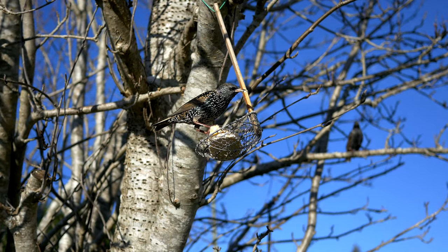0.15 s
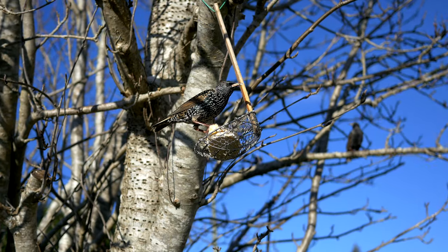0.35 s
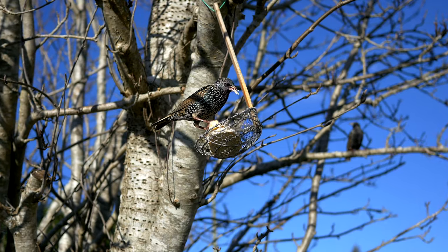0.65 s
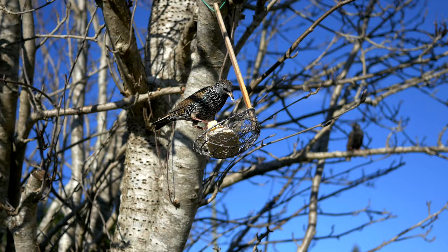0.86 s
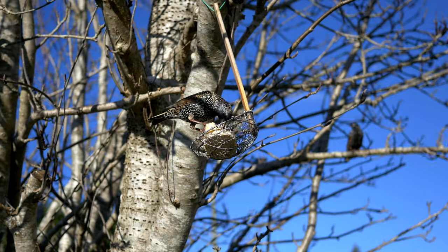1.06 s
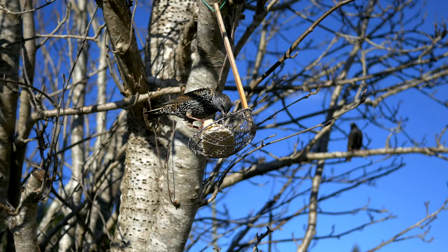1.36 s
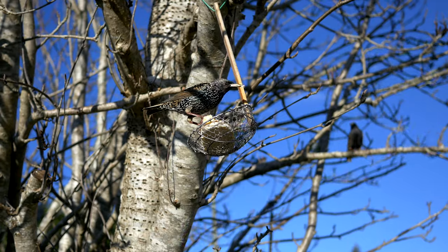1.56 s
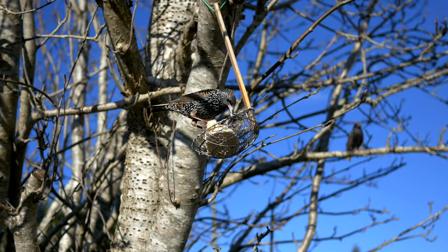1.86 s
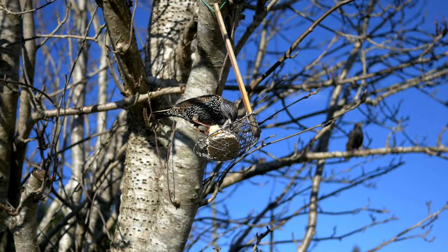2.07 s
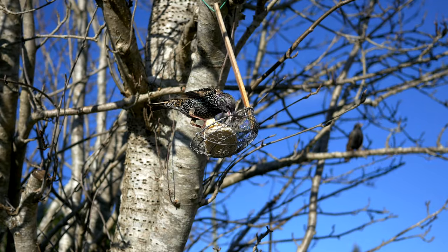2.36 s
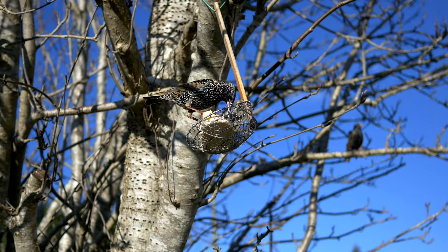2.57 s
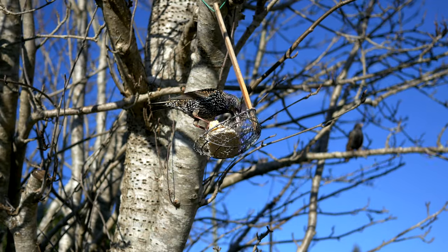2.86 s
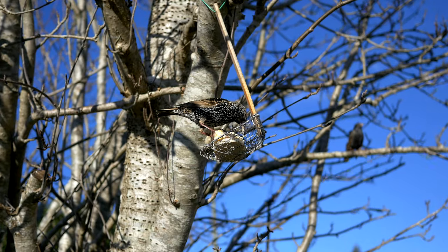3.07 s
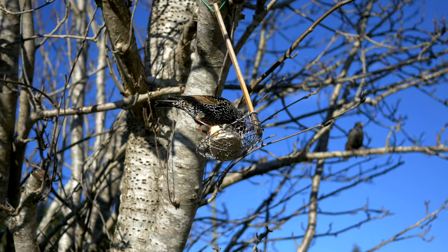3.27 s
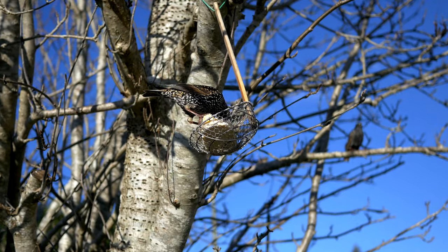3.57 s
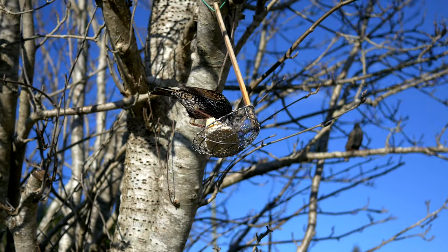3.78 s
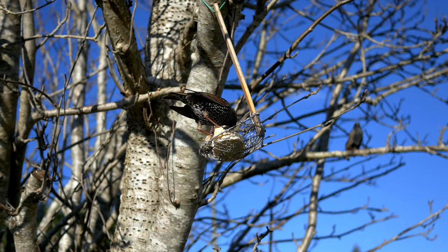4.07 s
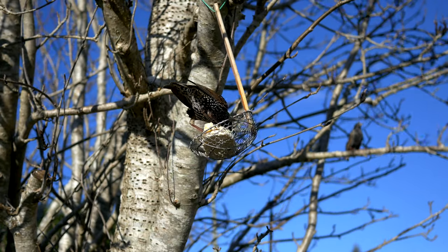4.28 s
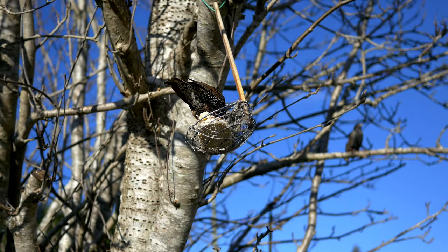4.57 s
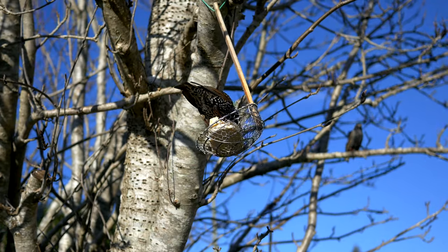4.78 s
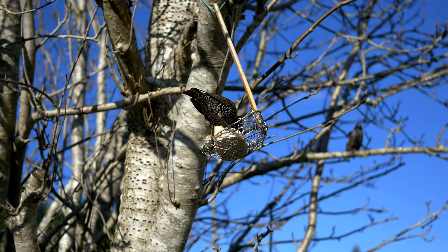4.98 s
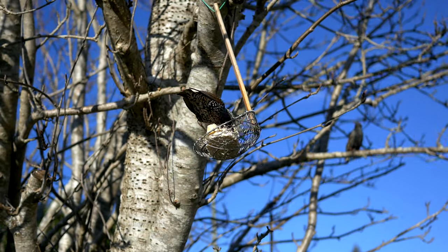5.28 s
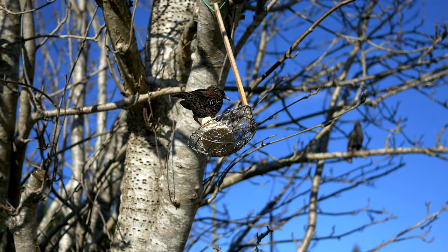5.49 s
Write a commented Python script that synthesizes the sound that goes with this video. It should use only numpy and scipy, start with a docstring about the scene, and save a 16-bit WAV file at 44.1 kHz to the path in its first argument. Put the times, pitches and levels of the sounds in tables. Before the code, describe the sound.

A starling at a tree feeder gives fast buzzy trills, clicks and short rising whistles while wind rumbles hard on the microphone over distant traffic.

```python
"""A garden feeder among bare trees, with a far road behind: a starling sings fast buzzy trills and short croaks.
The trills are swept harmonic voices with rasp, the croaks hoarse harmonic tones, the hisses and clicks shaped noise.
Gliding tones make rising whistles, chirps and another bird's long note; trunks and branches echo the birds.
Wind buffets the microphone as low rumble, much harder after the first second, over the coloured noise of traffic."""
import sys
import numpy as np
from scipy import signal
from scipy.fft import rfft, irfft, next_fast_len
from scipy.io import wavfile
from scipy.ndimage import uniform_filter1d, map_coordinates

SR = 44100
rng = np.random.default_rng(int(sys.argv[2]) if len(sys.argv) > 2 else 0)


def log_audio(samples):
    """Write samples as a 16-bit WAV file to the path given in sys.argv[1]."""
    # one column per channel
    frames = np.atleast_2d(samples).T
    # limit to full scale, then quantise
    limited = np.clip(frames, -1, 1)
    pcm = np.round(limited * 32767).astype(np.int16)
    wavfile.write(sys.argv[1], SR, pcm)


N = 248283  # length in samples

# Levels are relative settings ahead of the final mix; spectra give the balance between frequencies.
# colour of the traffic rush: (freq_hz, density_db)
ROAD_COLOUR = [(240, -5.5), (400, -8), (425, -8.5), (685, -6), (752, -4.5), (824, -4), (991, -5.5),
               (1390, -10.5), (1600, -9.5), (2490, -17), (6090, -33), (12500, -34), (14400, -36.5),
               (15800, -39.5)]
# level of the steady background rush and hiss, which dips at times: (time_s, level_db)
BACKGROUND_LEVEL = [(0, -39), (1.2, -36), (1.4, -41.5), (1.95, -37), (2.6, -43), (3.3, -36), (3.7, -36.5),
                    (4.05, -39), (4.6, -39), (5.63, -39)]
# tyres singing as cars pass: (time_s, level_db, half_length_s)
CAR_PASSES = [(.5, -53, 0.15), (1.233, -50, 0.41), (1.915, -42.5, 0.3), (5.393, -42, 0.17)]
# colour of the wind rumble: (freq_hz, density_db)
WIND_COLOUR = [(11, -42), (18, -20), (43, 2), (64, 1.5), (87, 1.5), (147, -9), (205, -16), (322, -25),
               (376, -20.5), (398, -30.5), (421, -30.5), (520, -37), (680, -39), (1140, -120)]
# strength of the buffeting: (time_s, level_db)
WIND_LEVEL = [(0, -33), (.1, -39), (.17, -29), (.32, -28.5), (.42, -42), (.95, -45), (1.1, -26),
              (1.3, -25.5), (1.45, -20), (1.8, -21), (2.65, -18), (3.12, -27.5), (3.5, -27), (3.85, -17),
              (4.1, -23), (4.3, -16.5), (4.6, -19.5), (5.0, -18.5), (5.13, -26.5), (5.63, -31)]
# brief gusts on top of it: (time_s, boost_db)
GUSTS = [(1.61, 5.5), (1.98, 2.5), (2.26, 4.5), (2.51, 1.5), (2.72, 4), (2.84, 2.5), (3.0, 8.5), (3.6, 7.5),
         (4.45, 0), (5.05, 4), (5.165, 11.5)]
# single hard eddies: (time_s, peak_db, freq_hz)
EDDIES = [(1.4, -4, 55.6), (2.151, -5, 55), (4.013, -7, 73)]
GUST_S, EDDY_S = 0.028, 0.011  # half-lengths

# short slurred chirps: (start_s, length_s, start_hz, middle_hz, end_hz, level_db)
CHIRPS = [ (.127, 0.012, 6700, 9300, 10500, -48), (0.187, 0.016, 10000, 6900, 10200, -49.5),
          (0.579, .033, 3620, 4930, 5450, -46.5), (1.18, 0.036, 3240, 3430, 3400, -38.5),
          (1.187, 0.031, 6850, 6850, 6700, -41), (1.192, 0.019, 6800, 6300, 5260, -40),
          (2.147, 0.025, 3900, 3580, 3380, -43.5), (2.148, 0.028, 6450, 6700, 6500, -46),
          (2.278, .017, 3380, 3700, 4250, -43.5), (2.356, 0.022, 6350, 6200, 6660, -46),
          (2.395, .014, 5550, 5600, 5750, -47), (2.448, .009, 1800, 1870, 1950, -36),
          (2.519, 0.022, 2900, 3240, 2790, -37.5), (3.295, 0.076, 4000, 5820, 6630, -42),
          (3.44, 0.025, 4150, 4720, 5100, -36.5), (3.443, .009, 2200, 2260, 2300, -33),
          (3.454, .024, 3570, 4150, 5350, -33), (3.479, 0.014, 4590, 5020, 5900, -37),
          (3.499, 0.034, 2910, 3300, 2500, -42), (3.835, .018, 4000, 3700, 4800, -44),
          (3.903, 0.0071, 3320, 4950, 3300, -45), (3.916, .015, 6100, 6150, 6400, -48),
          (3.932, .011, 3500, 4600, 3900, -38), (3.949, 0.025, 5780, 5500, 6500, -38),
          (5.199, 0.078, 3060, 3010, 2930, -53.5), ]
CHIRP_ARCH_DB = 2.5  # a chirp's ends lie this far under its middle
# dry clicks: (time_s, level_db, dull_above_hz)
CLICKS = [(0.4753, -37, 12000), (1.234, -33, 4000), (1.248, -35, 3200), (1.2668, -28, 3960),
          (1.2775, -31, 5500), (2.1034, -28.5, 15000), (2.3844, -33, 9000), (2.6762, -33, 15000),
          (3.289, -17.5, 15000), (5.1542, -38, 15000)]
# colour of a click: (freq_hz, density_db)
CLICK_COLOUR = [(1500, 0), (2500, 10), (5000, -8), (7000, 1), (10000, -2), (15000, 2)]
# the long sagging whistle of another bird: (time_s, pitch_hz, level_db)
LONG_WHISTLE = [(0.6, 3204, -47), (0.624, 3470, -41), (0.712, 3488, -44.5), (0.732, 3400, -31),
                (0.754, 3240, -43), (0.79, 3412, -34.5), (0.844, 3370, -36.5), (0.874, 3030, -40),
                (0.918, 3003, -35.5), (0.936, 2843, -45), (0.964, 2830, -39), (0.972, 2810, -40),
                (1.02, 2626, -51), (1.154, 2730, -45), (1.17, 2590, -58)]
# starling hisses just before a trill: (start_s, length_s, level_db)
HISSES = [(1.224, 0.049, -45), (5.368, 0.024, -37)]
# colour of the birds' rasp: (freq_hz, density_db)
RASP_COLOUR = [(700, -23), (1200, 0.5), (2200, 2), (3500, 7.5), (5000, 6), (6500, -2.5), (8000, -4),
               (9200, 0.5), (10500, -21), (13500, -6), (16000, -21)]
# colour of the brighter sizzle on trills and whistles: (freq_hz, density_db)
SIZZLE_COLOUR = [(3000, -23), (7000, 12), (10500, -5), (13500, -10), (16000, -20)]

# trills: (start_s, loudest_s, end_s, start_hz, loudest_hz, end_hz, level_db, fade_db, first_sweeps_per_s,
#          slowing_per_s, sweep_depth_octaves, lower_voice_db, overtone_db, most_strained_s,
#          strain_half_length_s, rasp_db)
TRILLS = [ (1.281, 1.334, 1.462, 2078, 2354, 2893, -26.5, 35, 76, 3, 0.43, -4.5, -6, 1.310, .027, -40.5),
          (2.263, 2.335, 2.400, 2147, 3240, 3520, -39.5, 6, 62, 1, 0.21, -4, -4, 2.382, 0.021, -50),
          (3.057, 3.146, 3.208, 3020, 3090, 3020, -38, 2.5, 92, 6.5, 0.46, 1.5, -12, 3.16, .06, -65),
          (3.279, 3.336, 3.385, 2255, 3200, 2750, -28, 24, 54, 1, 0.32, -22, -17, 3.335, 0.054, -47.5),
          (3.829, 3.861, 3.948, 2380, 2600, 3740, -36.5, 24, 67, 1, 0.25, -8, -12, 3.945, 0.016, -51),
          (4.037, 4.116, 4.192, 2098, 3064, 2836, -22, 15, 84, 4.5, 0.248, -11, -13.5, 4.112, 0.059, -40),
          (4.961, 5.042, 5.150, 2670, 2910, 3090, -37.5, 11.5, 65, 4, .43, -0.5, -25, 5.05, 0.087, -63),
          (5.384, 5.393, 5.458, 2550, 2527, 2490, -28, 2, 82, 0.5, .27, -30, 7.5, 5.424, 0.074, -39), ]
# resonances of throat and beak that the trills sweep through: (freq_hz, gain_db)
THROAT = [(1600, -15), (2200, 1), (2550, -4), (3000, 1.5), (3800, -5), (4650, -6.5), (5700, -12.5),
          (6900, -9.5), (8000, -12), (9000, -8), (12000, -7)]
TRILL_SWELL_DB = 5.5  # rise from the start to the loudest moment
# sweeps open out and close again: shares of depth, length, depth
FIRST_DEPTH, WIDEST_AT, LAST_DEPTH = 0.439, 0.63, 0.52
# loss of strain one half-length from the most strained moment, and at most
STRAIN_EDGE_DB, RELAXED_DB = 6.5, 32.5
# the lower voice: its pitch when the upper is at the pivot, and how far it follows in octaves per octave
LOW_VOICE_HZ, LOW_FOLLOWS, LOW_PIVOT_HZ = 1919, 0.55, 2868

# croaks: (start_s, length_s, start_pitch_hz, level_db)
CROAKS = [(1.284, 0.053, 1030, -30.5), (2.412, 0.022, 1013, -26), (3.402, 0.015, 1116, -30.5),
          (3.970, 0.02, 1013, -27.5)]
# harmonics of a croak: (multiple, level_db)
CROAK_HARMONICS = [(1, 0), (2, 3), (3, -6.5), (4, -37), (5, -44), (6, -21), (7, -21.5), (9, -23)]
CROAK_RISE_HZ_PER_S, CROAK_JITTER = 2080, 0.03  # jitter is a share of the pitch
# a warble that breaks into a rising whistle: (start_s, length_s, warble_hz, final_hz, level_db, rise_fade_db)
FLOURISHES = [(2.431, .076, 4040, 5920, -32, 15), (3.991, .069, 4270, 6340, -30.5, 10)]
WARBLE_S, WARBLE_HZ, WARBLE_OCTAVES, RISE_SHAPE = 0.034, 46.5, 0.141, 0.66

# nearby trunks throw the song back: (delay_s, level_db)
TRUNKS = [(.0045, -15.5), (.0095, -12), (.021, -26)]
# decay of the echo from the trees: (freq_hz, t60_s)
TREE_DECAY = [(500, 0.5), (3000, 0.27), (12000, 0.15)]
ECHO_DB = -15
TOP_HZ = 15800  # upper band limit


def amp(db):
    """Decibels to gain."""
    return 10 ** (np.asarray(db) / 20)


def unit(x):
    """Scale to rms 1."""
    return x / np.sqrt(np.mean(x ** 2) + 1e-20)


def along(points, hz):
    """Read (frequency, value) points on a log frequency axis."""
    f, v = np.transpose(points)
    return np.interp(np.log(hz + 1), np.log(f + 1), v)


def curves(rows, t):
    """Each column after the time, at the times t."""
    s, *cols = np.transpose(rows)
    return [np.interp(t, s, c) for c in cols]


def wobble(rate, t):
    """A smooth random curve, rate knots a second."""
    u = (t - t[0]) * rate
    return map_coordinates(rng.standard_normal(int(u[-1]) + 4), [u + 1])


def bell(t, centre, width):
    """A smooth bump of height 1."""
    return np.exp(-((t - centre) / width) ** 2)


def filtered(x, response):
    """Shape the spectrum of x by a response of frequency."""
    m = next_fast_len(len(x) + 8192)
    return irfft(rfft(x, m) * response(np.fft.rfftfreq(m, 1 / SR)), m)[:len(x)]


def noise(spectrum, size):
    """Coloured noise of rms 1."""
    return unit(filtered(rng.standard_normal(size), lambda hz: amp(along(spectrum, hz))))


def note(start, end, fade):
    """Sample times of a note, its soft on-off gate and its progress from 0 to 1."""
    t = np.arange(round((start - fade / 2) * SR), round((end + fade / 2) * SR)) / SR
    edge_s = np.minimum(t - t[0], t[-1] - t)
    gate = np.sin(np.pi / 2 * np.clip(edge_s / fade, 0, 1)) ** 2
    return t, gate, np.clip((t - start) / (end - start), 0, 1)


def turn(hz):
    """Running phase of a changing frequency."""
    return 2 * np.pi * np.cumsum(hz) / SR


def add(out, s, x):
    """Mix x into out from time s on."""
    i = max(round(s * SR), 0)
    out[i:i + len(x)] += x[:max(len(out) - i, 0)]


def traffic(far_tyres_db=-54, hiss_db=-18, whine_hz=1020, width_hz=70, split_hz=4500):
    """A far road: broad rush with faint hiss above, and a band of tyre whine that swells with each car."""
    t = np.arange(N) / SR
    level_db, = curves(BACKGROUND_LEVEL, t)
    low = unit(filtered(noise(ROAD_COLOUR, N), lambda hz: 1 / np.sqrt(1 + (hz / split_hz) ** 6)))
    high = unit(filtered(noise(ROAD_COLOUR, N), lambda hz: 1 - 1 / (1 + (hz / split_hz) ** 6)))
    rush = amp(level_db) * (low + amp(hiss_db) * high)
    passes = sum(amp(db) * bell(t, s, width) for s, db, width in CAR_PASSES)
    tyres = unit(filtered(rng.standard_normal(N), lambda hz: 1 / (1 + ((hz - whine_hz) / width_hz) ** 2)))
    return rush + (amp(far_tyres_db) + passes) * amp(wobble(3.1, t)) * tyres


def wind(evenness=0.63, lumps_db=1.5):
    """Turbulence on the microphone: a lumpy rumble with brief gusts and a few single hard pushes."""
    t = np.arange(N) / SR
    db, = curves(WIND_LEVEL, t)
    db = db + sum(boost * bell(t, s, GUST_S) for s, boost in GUSTS) + lumps_db * wobble(18, t)
    rumble = noise(WIND_COLOUR, N)
    # partly level the noise's own swells, so the buffeting curve and gusts stand out
    swell = np.abs(uniform_filter1d(rumble ** 2, size=SR // 12)) + 1e-6
    rumble = unit(rumble / swell ** (evenness / 2))
    pushes = sum(amp(peak) * bell(t, s, EDDY_S) * np.cos(2 * np.pi * hz * (t - s)) for s, peak, hz in EDDIES)
    return amp(db) * rumble + pushes


def whistle(t, hz, jitter=0.0088, flutter_db=4.0, rough=0.15, second_db=-29, third_db=-41, rasp_db=-24,
            sizzle_db=-31, force_db=8, force_hz=3650):
    """A gliding tone of rms 1 with a tremor: nearly pure when low, rougher and brighter when forced high."""
    harsh = amp(force_db * np.clip((hz - force_hz) / 300, 0, 1))
    phase = turn(hz * (1 + jitter * harsh * wobble(715, t)))
    overtones = sum(amp(level) * np.sin(k * phase) * (k * hz < SR / 2)  # nothing above half the sample rate
                    for k, level in enumerate([second_db, third_db], 2))
    rasp = amp(rasp_db) * noise(RASP_COLOUR, len(t)) + amp(sizzle_db) * noise(SIZZLE_COLOUR, len(t))
    tremor = amp(flutter_db * wobble(150.4, t)) * (1 + rough * harsh * wobble(800, t))
    return unit(tremor * (np.sin(phase) + harsh * (overtones + rasp)))


def chirps():
    """Each chirp bends through one arc of pitch and swells towards the middle."""
    out = np.zeros(N)
    for start, length, start_hz, middle_hz, end_hz, db in CHIRPS:
        t, gate, u = note(start, start + length, fade=0.0039)
        arch = 1 - (2 * u - 1) ** 2
        hz = start_hz + (end_hz - start_hz) * u + (middle_hz - (start_hz + end_hz) / 2) * arch
        add(out, t[0], gate * amp(db - CHIRP_ARCH_DB * (2 - arch)) * whistle(t, hz))
    return out


def clicks(t60=0.0086, level_db=3):
    """Each click is a snap of fast-dying noise without ring, some bright, some dull."""
    out, t = np.zeros(N), np.arange(SR // 30) / SR
    for s, db, dull_hz in CLICKS:
        burst = noise(CLICK_COLOUR, len(t)) * amp(-60 * t / t60)
        snap = filtered(burst, lambda hz: 1 / np.sqrt(1 + (hz / dull_hz) ** 4))
        add(out, s, amp(db + level_db) * snap / np.abs(snap).max())
    return out


def long_whistle():
    """One nearly pure note that holds, then sags and fades while its level flickers."""
    out = np.zeros(N)
    t, gate, _ = note(LONG_WHISTLE[0][0], LONG_WHISTLE[-1][0], fade=.006)
    hz, db = curves(LONG_WHISTLE, t)
    add(out, t[0], gate * amp(db) * whistle(t, hz, jitter=0.018, flutter_db=1.0))
    return out


def hisses():
    """Toneless rasp before the bird's voice catches."""
    out = np.zeros(N)
    for start, length, db in HISSES:
        t, gate, _ = note(start, start + length, fade=0.0069)
        add(out, t[0], gate * amp(db) * noise(RASP_COLOUR, len(t)))
    return out


def trills(cusp=0.22, jitter=0.033, flutter_db=3, rolloff_db=-6.0, rasp_db=6, tone_db=-1, trough_db=2,
           downstroke_db=1, low_jitter=0.095, sizzle_db=-44, brightening=0.24):
    """The syrinx swings its pitch dozens of times a second, slowing; strain adds overtones and rasp."""
    out = np.zeros(N)
    for (start, peak, end, start_hz, peak_hz, end_hz, peak_db, fade_db, rate, slowing, widest,
         under_db, bright_db, strained, strain_s, forced_db) in TRILLS:
        t, gate, u = note(start, end, fade=.006)
        hz = np.interp(t, [start, peak, end], [start_hz, peak_hz, end_hz])
        swell_db = -TRILL_SWELL_DB * np.interp(t, [start, peak], [1, 0]) ** 2
        db = peak_db + swell_db - fade_db * np.interp(t, [peak, end], [0, 1]) ** 2.5
        strain_db = -np.minimum(STRAIN_EDGE_DB * ((t - strained) / strain_s) ** 4, RELAXED_DB)
        over_db, air_db = bright_db + brightening * strain_db, forced_db + strain_db

        depth = widest * np.interp(u, [0, WIDEST_AT, 1], [FIRST_DEPTH, 1, LAST_DEPTH])
        beat = turn(rate * np.exp(-slowing * (t - start)) * (t >= start))  # a trill starts on a crest
        sweep = np.cos(beat) + cusp * np.cos(2 * beat)  # round troughs, pointed crests
        pitch = hz * 2 ** (depth * (sweep + 0.124 * wobble(202.7, t)) + jitter * wobble(1400, t))
        phase = turn(pitch)

        def partial(k):
            """Harmonic k, coloured by the throat as it sweeps."""
            return amp(along(THROAT, k * pitch)) * np.sin(k * phase) * (k * pitch < SR / 2)

        overtones = sum(amp(over_db + rolloff_db * (k - 2)) * partial(k) for k in range(2, 7))
        # loudest falling into a trough
        pulse_db = -trough_db * sweep / 2 + downstroke_db * np.sin(beat) + flutter_db * wobble(350.5, t)
        pulse = unit(amp(pulse_db))

        # the other side of the syrinx sounds a rougher, lower voice, strongest just after each crest
        low_bend = 0.34 * depth * sweep + low_jitter * wobble(900, t)  # octaves
        low_hz = LOW_VOICE_HZ * (hz / LOW_PIVOT_HZ) ** LOW_FOLLOWS * 2 ** low_bend
        low_pulse = unit(amp(2.1 * np.sin(beat) + 5.1 * wobble(341.4, t)))
        low = amp(under_db) * depth / widest * np.sin(turn(low_hz)) * low_pulse

        voice = np.sqrt(2) * amp(db + tone_db) * (pulse * (partial(1) + overtones) + low)
        rasp = amp(air_db + rasp_db) * noise(RASP_COLOUR, len(t))
        # grows faster than the rasp
        sizzle = amp(sizzle_db + 8.6 * (air_db + 39.0)) * noise(SIZZLE_COLOUR, len(t))
        air = pulse * (rasp + sizzle) * (1 + 0.097 * np.sin(phase))
        add(out, t[0], gate * (voice + air))
    return out


def croaks(level_db=-0.5, rasp_db=-17):
    """Short, hoarse low notes, rising in pitch, that open a trill or lead into the rising whistles."""
    out = np.zeros(N)
    for start, length, hz, db in CROAKS:
        t, gate, _ = note(start, start + length, fade=.008)
        rising_hz = hz + CROAK_RISE_HZ_PER_S * (t - start)
        phase = turn(rising_hz * (1 + CROAK_JITTER * wobble(900, t)))
        harmonics = sum(amp(level) * np.sin(k * phase) for k, level in CROAK_HARMONICS)
        tone = unit(harmonics * (1 + 0.85 * wobble(707, t)))
        rasp = amp(rasp_db) * noise(RASP_COLOUR, len(t))
        add(out, t[0], gate * amp(db + level_db) * (tone + rasp))
    return out


def flourishes():
    """A loud warble, then a glide upward that fades as it climbs."""
    out = np.zeros(N)
    for start, length, warble_hz, final_hz, db, fade_db in FLOURISHES:
        t, gate, _ = note(start, start + length, fade=.0055)
        warble = -WARBLE_OCTAVES * np.sin(2 * np.pi * WARBLE_HZ * np.minimum(t - start, WARBLE_S))
        rise = np.clip((t - start - WARBLE_S) / (length - WARBLE_S), 0, 1) ** RISE_SHAPE
        hz = warble_hz * 2 ** warble * (1 - rise) + final_hz * rise
        add(out, t[0], gate * amp(db - fade_db * rise) * whistle(t, hz))
    return out


def trunks(x):
    """A few distinct early reflections off nearby trunks."""
    return sum(amp(db) * np.pad(x, (round(delay * SR), 0))[:N] for delay, db in TRUNKS)


def trees(x):
    """Trunks and branches scatter a short echo whose treble dies first."""
    hz, t, z = signal.stft(rng.standard_normal(SR // 2), SR, nperseg=256)
    decay = amp(-60 * t / along(TREE_DECAY, hz)[:, None])
    tail = signal.istft(z * decay, SR, nperseg=256)[1]
    return signal.fftconvolve(np.pad(x, (200, 0)), tail / np.linalg.norm(tail))[:N]  # 200 samples late


def scene():
    """Birds among the trees, wind and the far road."""
    song = chirps() + long_whistle() + hisses() + trills() + croaks() + flourishes()
    birds = amp(0.4) * (song + trunks(song)) + clicks()
    return (traffic() + wind() + birds + amp(ECHO_DB) * trees(birds))[None]


def record(dry, low_cut_hz=26):
    """Roll off the deepest rumble and keep nothing above the band limit."""
    def response(hz):
        return (hz < TOP_HZ) * hz ** 4 / np.sqrt(hz ** 8 + low_cut_hz ** 8.0)
    return filtered(dry[0], response)[None]


dry = scene()
out = record(dry)
log_audio(out)
```